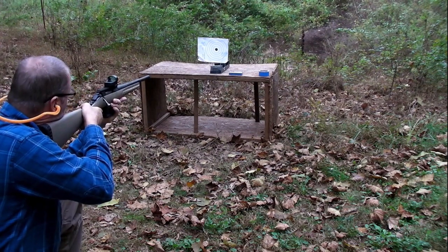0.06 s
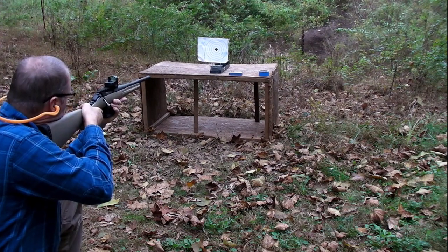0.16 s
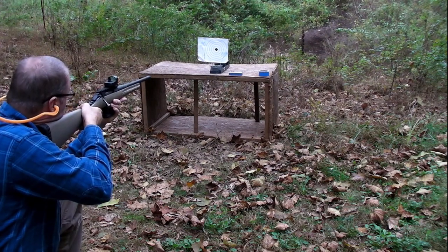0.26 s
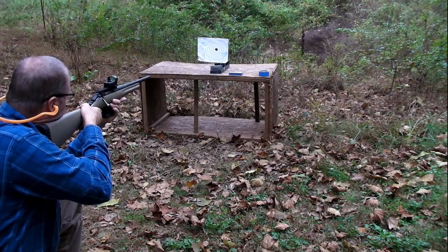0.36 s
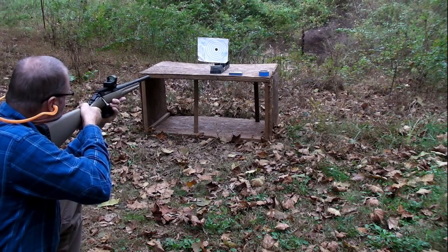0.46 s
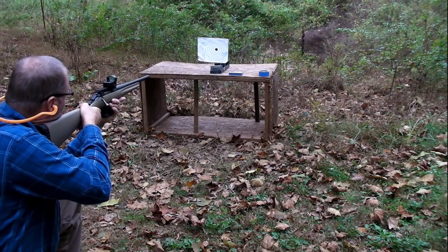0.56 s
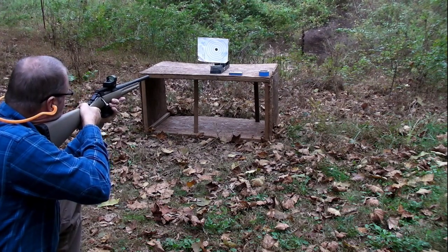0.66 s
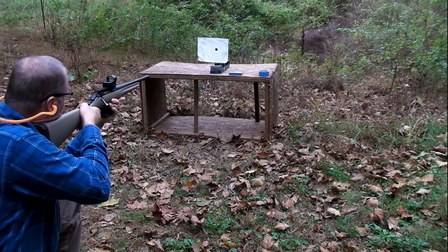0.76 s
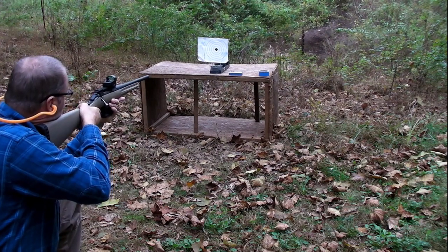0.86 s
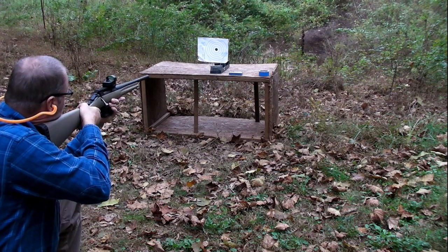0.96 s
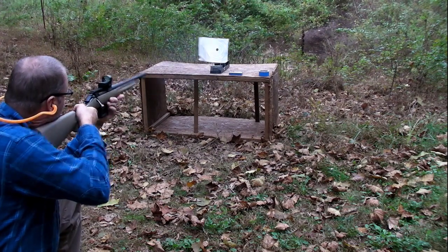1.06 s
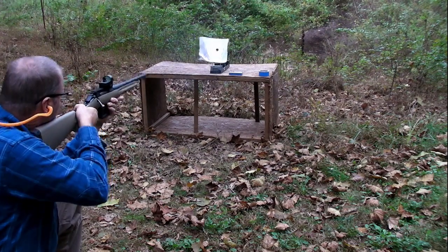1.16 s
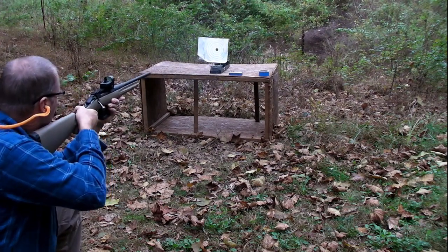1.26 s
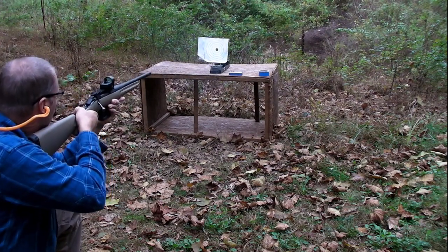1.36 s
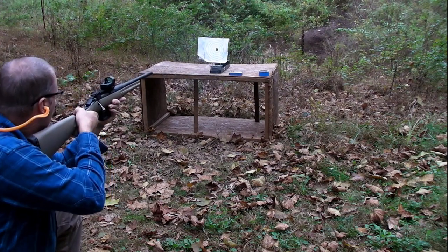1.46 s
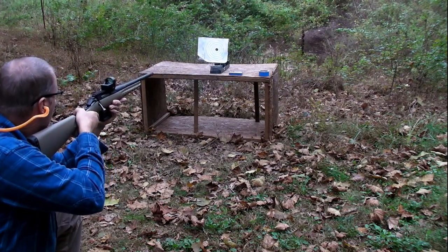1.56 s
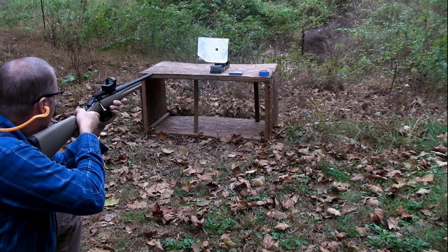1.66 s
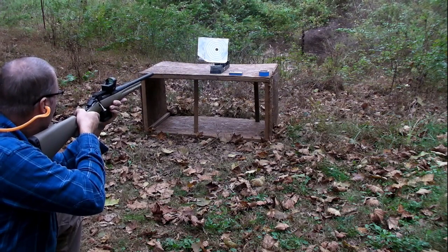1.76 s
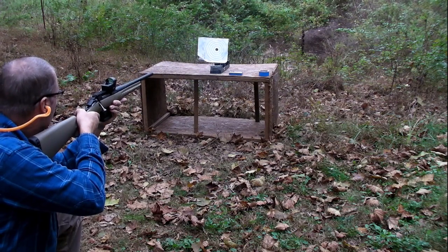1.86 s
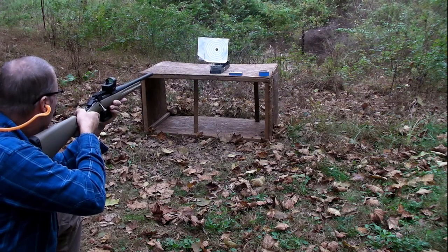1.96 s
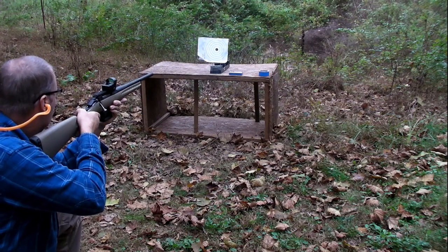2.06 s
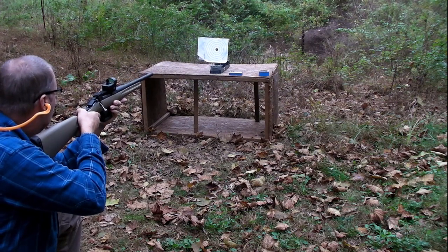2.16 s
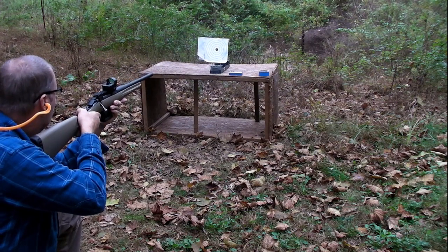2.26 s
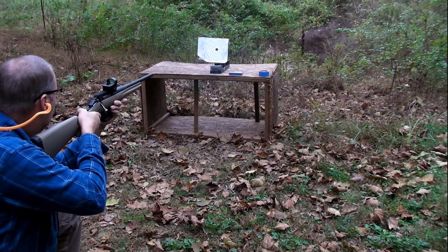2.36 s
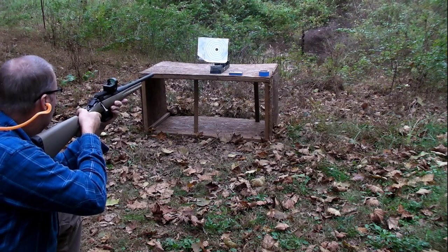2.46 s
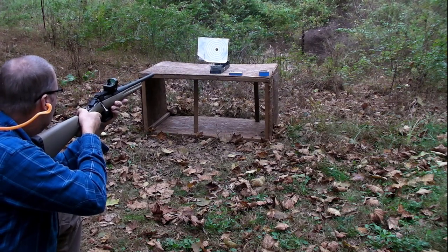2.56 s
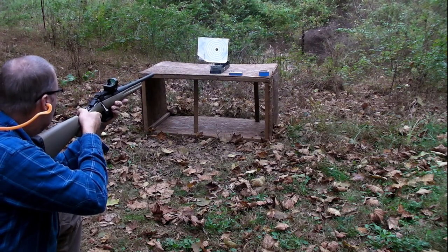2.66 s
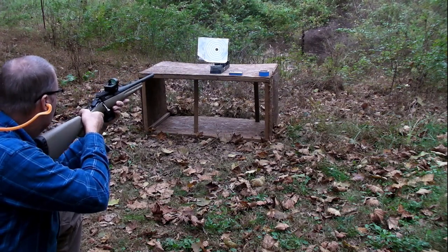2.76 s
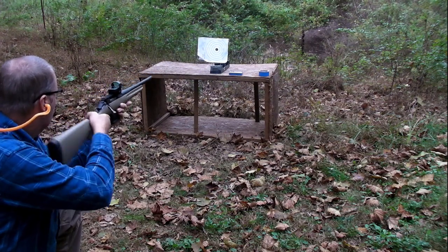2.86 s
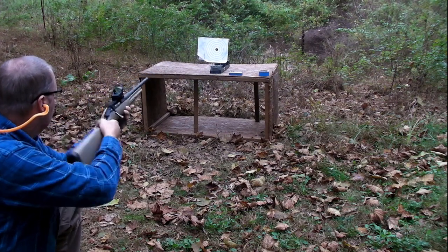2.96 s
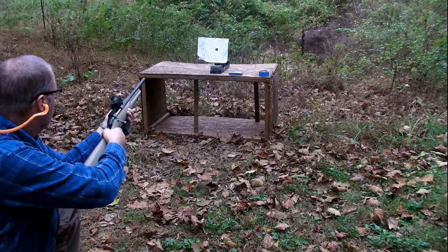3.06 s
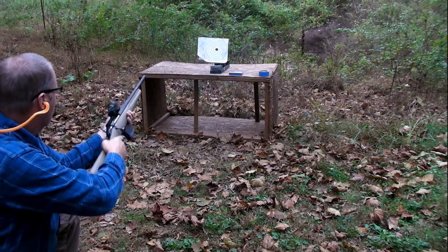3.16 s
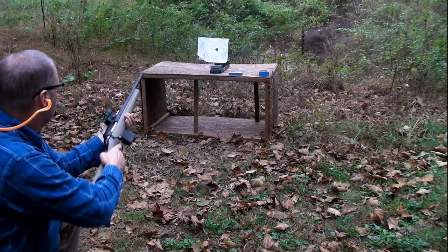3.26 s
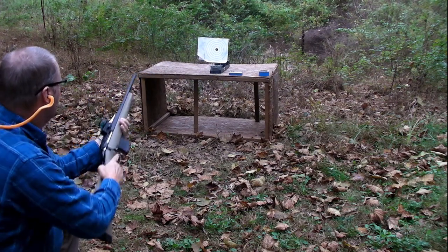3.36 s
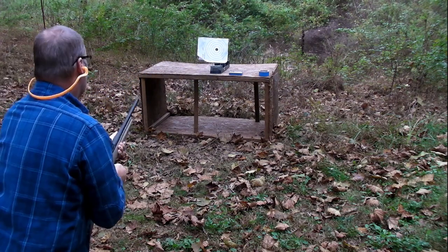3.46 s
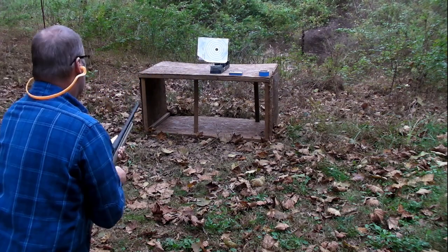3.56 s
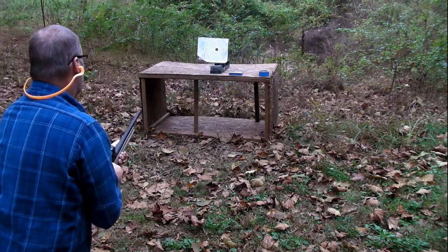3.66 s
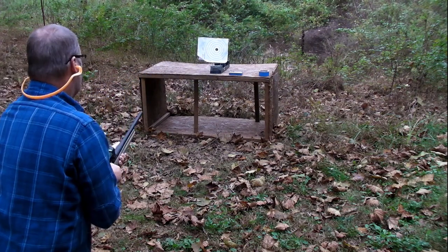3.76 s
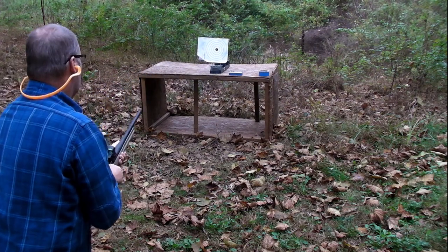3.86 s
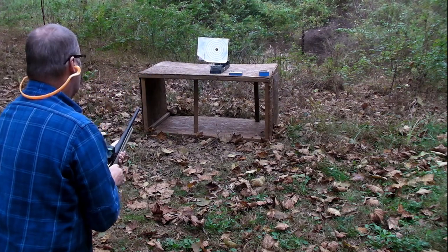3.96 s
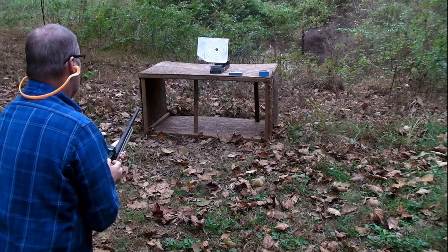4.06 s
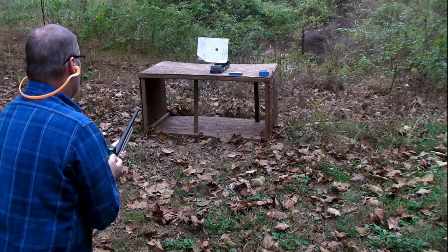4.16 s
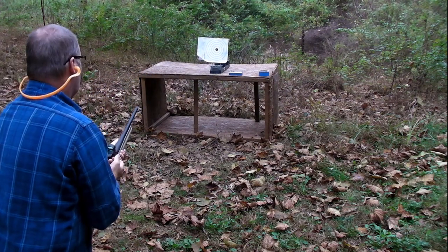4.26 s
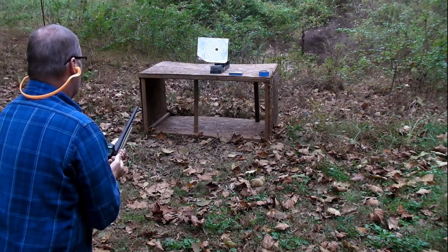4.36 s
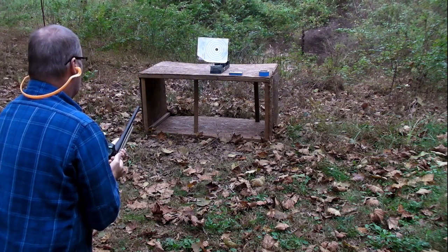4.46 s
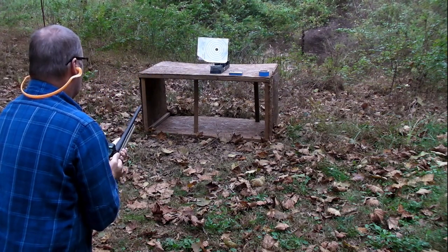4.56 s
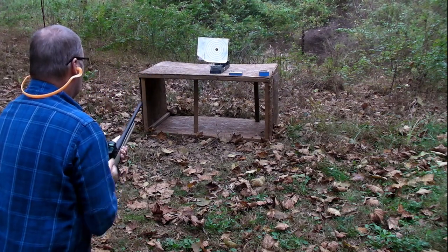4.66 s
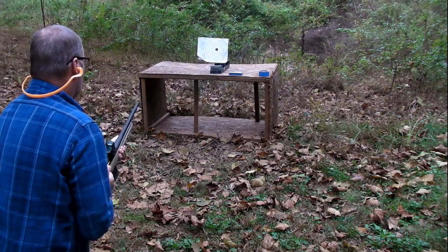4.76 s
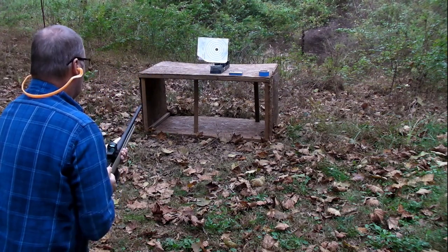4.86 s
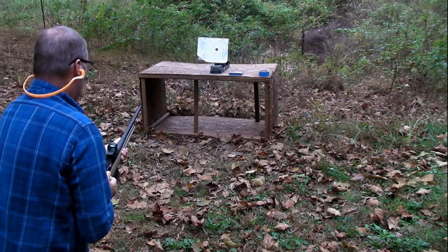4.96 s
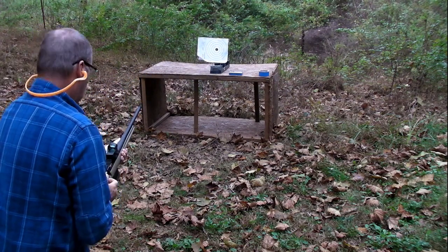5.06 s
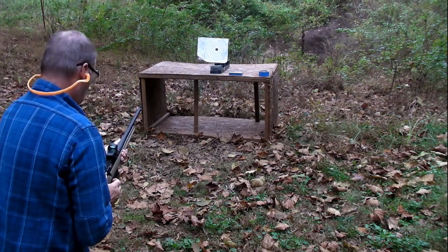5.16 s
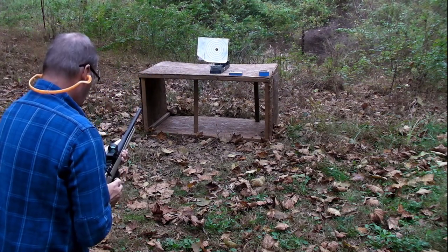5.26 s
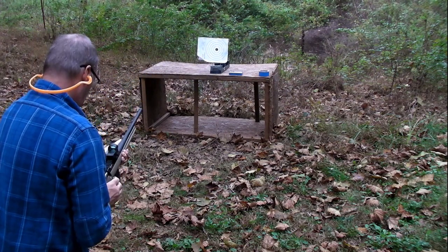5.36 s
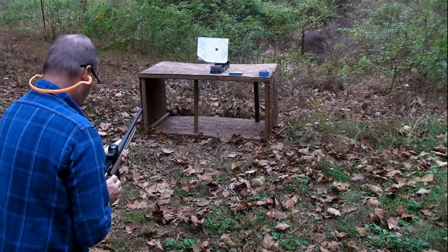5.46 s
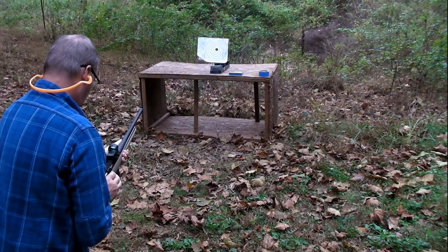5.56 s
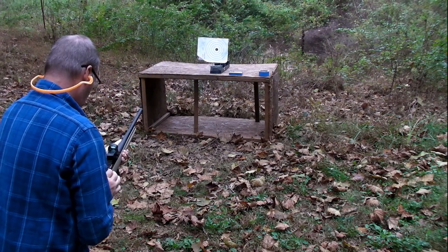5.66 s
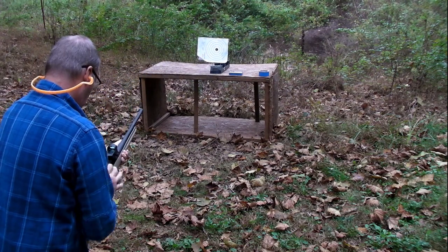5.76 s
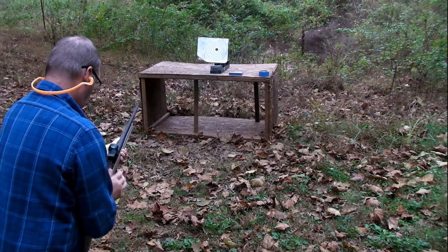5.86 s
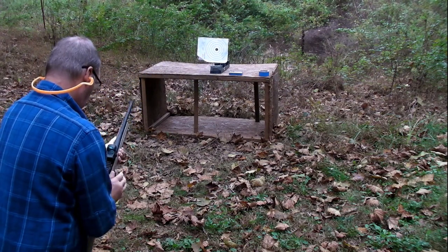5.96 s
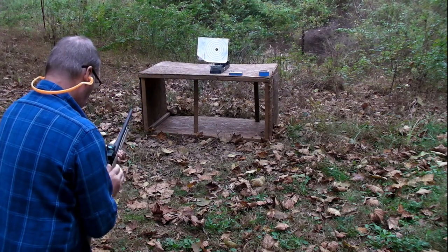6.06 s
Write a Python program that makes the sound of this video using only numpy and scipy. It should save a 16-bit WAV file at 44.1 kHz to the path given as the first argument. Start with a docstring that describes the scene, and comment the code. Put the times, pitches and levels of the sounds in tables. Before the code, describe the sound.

Crickets trill quietly, one close rifle blast cracks and rumbles through trees, then sharp metallic action clacks and sleeve rustles follow.

```python
"""In an autumn wood, one rifle shot overloads a nearby microphone and rolls away through the trees.
The shot is a swelling ring and a roar of noise; its echo is noise that loses treble, then stops abruptly.
Then sleeves rustle as shaped noise, and the rifle's action clacks and scrapes through its resonances.
Crickets trill throughout as chirps and beating tones, and a far bird calls in short arched tones.
Faint air, hiss and soft low bumps lie underneath."""
import sys
import numpy as np
from scipy import signal
from scipy.fft import rfft, irfft
from scipy.io import wavfile
from scipy.ndimage import uniform_filter1d

SR = 44100
rng = np.random.default_rng(int(sys.argv[2]) if len(sys.argv) > 2 else 0)


def int16_out(signal):
    """Quantize to a 16-bit WAV file."""
    q = np.round(np.clip(np.atleast_2d(signal).T, -1, 1) * 32767)
    wavfile.write(sys.argv[1], SR, q.astype(np.int16))


N = 269451
T = np.arange(N) / SR
FREQS = np.maximum(np.arange(N // 2 + 1) * SR / N, 1)
SHOT_S, ECHO_STOP_S = 1.066, 3.482


def undb(db):
    """Turn decibels into a gain."""
    return 10 ** (np.asarray(db) / 20)


def unit(x):
    """Scale to an rms (average strength) of 1."""
    return x / np.sqrt(np.mean(x ** 2))


def at_hz(rows, hz, axis=1):
    """Read one column of a table, joined by straight lines in log frequency."""
    rows = np.array(rows)
    return np.interp(np.log(hz), np.log(rows[:, 0]), rows[:, axis])


def resonance(f, hz, width):
    """Complex response of one resonance, with gain 1 at its centre."""
    return 1 / (1 + 1j * (f / hz - hz / f) * hz / width)


def walk(rate):
    """Smooth random drift with a spread near 1; a higher rate wanders faster."""
    k = max(int(SR / rate), 1)
    steps = np.repeat(rng.standard_normal(N // k + 1), k)[:N]
    return 1.3 * uniform_filter1d(uniform_filter1d(steps, k), k)


def envelope(start_s, attack_s, hold_s, release_db_per_s):
    """Rise, stay until hold_s after the start, then die away."""
    age = T - start_s
    return np.clip(age / attack_s, 0, 1) * undb(-release_db_per_s * np.maximum(age - hold_s, 0))


# how unlike the two microphone ports hear a sound from all around, before each sound's own offset:
# (frequency [Hz], side minus mid [dB])
PORT_WIDTH = [(30, -21), (130, -26), (450, -27.5), (1500, -24.5), (2700, -13), (6000, -15.5), (9000, -5.5),
              (14000, -2)]


def diffuse(side_db=0):
    """Stereo spectrum of white noise from all around: alike in the bass, less alike in the treble."""
    mid, side = rfft(rng.standard_normal((2, N)))
    side = side * undb(np.minimum(at_hz(PORT_WIDTH, FREQS) + side_db, 0))
    return np.array([mid + side, mid - side])


def noise(colour, side_db=0):
    """Stereo noise from all around with a given balance of pitches, rms 1."""
    return unit(irfft(diffuse(side_db) * undb(at_hz(colour, FREQS)), N))


def trees(x, t60, wet_db):
    """Add the scatter from trunks and undergrowth: a fading noise tail, cut off after one second."""
    # (frequency [Hz], level per Hz [dB])
    scatter = noise([(100, -4.0), (600, -7.0), (2000, 2.5), (6000, 0.0), (15000, -1.5)])
    tail = (scatter * undb(-60 * T / t60) * np.minimum(T / 0.0099, 1))[:, :SR]
    tail = tail / np.sqrt(np.sum(tail ** 2) / 2)
    return x + undb(wet_db) * signal.fftconvolve(np.atleast_2d(x), tail, axes=1)[:, :N]


# the roar leaks in under the ring, bursts, sags while it holds, then collapses
ROAR_DB, ROAR_LEAK_DB = 6.5, -23
ROAR_DELAY_S, ROAR_ATTACK_S, ROAR_HOLD_S = .019, .007, .135
ROAR_SAG_DB_PER_S, ROAR_RELEASE_DB_PER_S = 50, 289.5  # the release adds to the sag
# tones of the ring ahead of the roar: (frequency [Hz], level [dB])
RING_TONES = [(657, -18), (1680, -2), (4312, -29.5)]
# pitch balance of the muzzle gas: (frequency [Hz], level per Hz [dB])
GAS_COLOUR = [(20, -5.5), (50, -6.5), (110, -1), (150, -4), (200, 3), (260, -5), (400, 1), (700, -0.5),
              (1700, 3.5), (3000, -1.5), (5500, -6.5), (10000, -14.5), (16000, -26.5)]


def muzzle(swell_s=0.014, hold_s=.012, ring_db=0.0, ring_decay_s=.012):
    """A hard ring swells for a moment, then the roar of the muzzle gas swamps it."""
    age = np.maximum(T - SHOT_S, 0)
    ring = sum(undb(db) * np.sin(2 * np.pi * hz * age + .12 * walk(300)) for hz, db in RING_TONES)
    fade = np.exp(-np.maximum(age - swell_s - hold_s, 0) / ring_decay_s)
    swell = np.minimum(age / swell_s, 1) * fade
    burst = envelope(SHOT_S + ROAR_DELAY_S, ROAR_ATTACK_S, ROAR_HOLD_S, ROAR_RELEASE_DB_PER_S)
    sag = undb(ROAR_DB - ROAR_SAG_DB_PER_S * (age - ROAR_DELAY_S))
    gas = burst * sag + swell * undb(ROAR_LEAK_DB)
    roar = noise(GAS_COLOUR, side_db=5.0) * gas * undb(0.87 * walk(130))
    return undb(ring_db) * swell * ring + roar


# pitch balance of the echo and what air and leaves take away as time passes (below zero: a gain):
# (frequency [Hz], level per Hz at the shot [dB], loss [dB/s])
ECHO_BANDS = [(25, -33, 11), (60, -20, 4), (101, -4, 3), (150.4, -10.5, 7), (203, -5, 17), (252, -15.5, 4),
              (350, -9, -3.5), (465, -2.5, -3.5), (753, 2.5, -0.5), (1230, -1.5, 3), (2010, -1, 8),
              (2732, -2.5, 15), (3530, -6.5, 19.5), (6000, -6.5, 37.5), (9700, -16.5, 54.5),
              (15000, -28.5, 84.5)]
# the blast thrown back by near trunks, a slope, the wide wood and one far face:
# (start [s], build-up [s], level [dB], fade [dB/s])
RETURNS = [(1.087, .042, 4, 59.5), (1.28, .22, -10.5, 39), (1.091, 0.46, -16.5, 14.8),
           (2.568, .005, -30, 190)]


def echo(patchy_db=0.9, grain_db=0.72):
    """Countless reflections as noise; the later ones have come further and lost more treble."""
    age, field, out = np.maximum(T - SHOT_S, 0), diffuse(), 0
    colour = undb(at_hz(ECHO_BANDS, FREQS))
    field = field * colour / np.sqrt(np.mean(colour ** 2))
    centres, _, losses = np.transpose(ECHO_BANDS)
    # overlapping bands, each fading at its own speed
    for share, loss_db in zip(np.eye(len(centres)), losses):
        band = irfft(field * np.interp(np.log(FREQS), np.log(centres), share), N)
        out = out + band * undb(-loss_db * age)
    power = sum((undb(db) * envelope(s, build_s, build_s, fade)) ** 2 for s, build_s, db, fade in RETURNS)
    roll = np.sqrt(power)
    # the roll's loudness wavers slightly at random
    waver = undb(patchy_db * walk(45) + grain_db * walk(500))
    stop = np.clip((ECHO_STOP_S - T) / .005, 0, 1)
    return out * waver * roll * stop


# resonances of the rifle's receiver and stock: (frequency [Hz], width [Hz], level [dB])
BODY_MODES = [(438, 135, -6), (574, 317, -3), (790, 213, -1.5), (1034, 260, -1), (1290, 204, -2),
              (1775, 320, -1.5), (2204, 260, -2), (3010, 500, -8), (3600, 320, -5), (4140, 280, -9.5),
              (5360, 680, -11), (6500, 1300, -12), (9200, 1900, -18.5), (12100, 2600, -22.5)]


def rifle_body(f):
    """Response of the receiver and stock: resonances added with alternating sign."""
    modes = enumerate(BODY_MODES)
    return sum((-1) ** k * undb(db) * resonance(f, hz, width) for k, (hz, width, db) in modes)


# metal parts of the action meeting; ring level is relative to the chatter:
# (time [s], level [dB], decay [s], ring [Hz], ring level [dB], treble tilt reached at 3000 Hz [dB])
CONTACTS = [(3.506, -41, .004, 2150, 5, -6), (3.653, -37, .0027, 2000, -7, 18),
            (3.6925, -22, 0.0038, 1620, 0, -5), (3.7037, -14.5, 0.002, 1460, 3, -1),
            (3.7065, -11, 0.0034, 1253, 2, -4), (4.669, -31, 0.008, 1647, -1, -5),
            (4.691, -27, .0053, 1500, -8, 0), (4.733, -20.5, .0033, 1410, 2, 0),
            (4.7367, -18.5, 0.0045, 1520, -1, 3), (4.749, -9.5, 0.0035, 553, -6, -2),
            (4.7515, -9, 0.0027, 2150, -2, -8), (4.755, -21, .0079, 522, -7, 1),
            (5.134, -43, .006, 2000, -12, 13), (5.145, -39, .0043, 1980, -5, 5),
            (5.818, -36.5, .0047, 1292, -3, -12), (5.8267, -26.5, 0.0035, 1180, -1, -14)]


def action(rise_s=0.0014, side_db=-3, low_cut_hz=150, size=4096):
    """Each contact chatters for a few milliseconds and rings the rifle and the part that was struck."""
    out = np.zeros((2, N + size))
    age, f = T[:size], np.maximum(np.arange(size // 2 + 1) * SR / size, 1)
    body = rifle_body(f) * (1j * f / (1j * f + low_cut_hz)) ** 2
    ports = np.array([np.ones_like(f), undb(at_hz(PORT_WIDTH, f) + side_db)])
    for s, db, decay_s, ring_hz, ring_db, treble_db in CONTACTS:
        fade = np.exp(-age / decay_s)
        chatter = rfft(rng.standard_normal((2, size)) * fade)
        # a hard contact excites all pitches more evenly
        chatter = chatter / np.sqrt(np.abs(chatter))
        tilt = undb(2 * treble_db * f / (f + 3000))
        mid, side = irfft(chatter * body * ports * tilt) * np.exp(-age / 0.052)
        part = np.sin(2 * np.pi * ring_hz * age) * fade * (1 - np.exp(-age / rise_s))
        mid = mid + undb(ring_db) * np.std(mid) * unit(part)
        # the level counts the whole clack's energy as if packed into decay_s
        gain = undb(db) * np.sqrt(decay_s * SR / size)
        start = int(s * SR)
        out[:, start:start + size] += gain * unit(np.array([mid + side, mid - side]))
    return trees(out[:, :N], t60=1.0, wet_db=-20.5)


# the bolt scraping along its track: (start [s], length [s], level [dB])
BOLT_SCRAPES = [(3.812, 0.036, -45), (4.644, .088, -40)]


def bolt_slide(attack_s=0.0084, release_db_per_s=600, grit_db=4, catch_db=2, low_cut_hz=1100, soft_hz=3200):
    """Steel catches and slips on steel; the fine jolts ring the rifle."""
    push = sum(undb(db) * envelope(s, attack_s, length_s, release_db_per_s)
               for s, length_s, db in BOLT_SCRAPES)
    jolts = irfft(diffuse(side_db=-3), N) * undb(grit_db * walk(1500) + catch_db * walk(150))
    contact = 1 / (1 + low_cut_hz / (1j * FREQS)) / (1 + 1j * FREQS / soft_hz)
    return unit(irfft(rfft(jolts) * rifle_body(FREQS) * contact, N)) * push


# a spring that sings on after the action snaps shut:
# (start [s], frequency [Hz], level [dB], time to fade by 60 dB [s])
SPRING_TONES = [(4.752, 1925, -47.5, 0.95), (4.752, 2050, -50, .4)]


def spring():
    """The latch leaves a spring ringing faintly: slightly unsteady, fading tones."""
    out = 0
    for s, hz, db, t60 in SPRING_TONES:
        age = np.maximum(T - s, 0)
        level = undb(db - 60 * age / t60 + 1.5 * walk(50))
        out = out + level * np.sin(2 * np.pi * hz * age + 0.2 * walk(40))
    return out


STROKE_ATTACK_S, STROKE_RELEASE_DB_PER_S, FIDGET_DB = 0.021, 125, -61
# pitch balance of the cloth: (frequency [Hz], level per Hz [dB])
CLOTH_COLOUR = [(60, -12), (150, -3), (350, -8), (800, -6.5), (1150, -5.5), (1450, 2.5), (2400, -5),
                (3400, -1.5), (6000, -5), (10000, -12.5), (15000, -19)]
# sleeves and hands sliding over the gun, one row a stroke: (start [s], length [s], level [dB])
CLOTH_STROKES = [(3.485, .345, -43), (3.608, .14, -40.5), (3.786, .04, -43), (4.655, .06, -49),
                 (4.709, 0.087, -37.5), (5.124, .025, -49), (5.307, 0.028, -56)]


def sleeves(grain_db=3, catch_db=1.5):
    """Cloth slides in tiny catches and slips with each stroke, and stirs faintly once the echo has stopped."""
    power = sum((undb(db) * envelope(s, STROKE_ATTACK_S, length_s, STROKE_RELEASE_DB_PER_S)) ** 2
                for s, length_s, db in CLOTH_STROKES)
    motion = np.sqrt(power + undb(FIDGET_DB) ** 2 * (T > ECHO_STOP_S))
    catches = unit(undb(grain_db * walk(1200) + catch_db * walk(77)))
    return noise(CLOTH_COLOUR) * catches * motion


LULL_HOLD_S, LULL_RETURN_S = 1.09, 1.65


def lull(depth_db):
    """Gain that sinks at the shot, stays low, creeps back, and is full at once when the echo stops."""
    sunk = np.clip(1 - (T - SHOT_S - LULL_HOLD_S) / LULL_RETURN_S, 0, 1)
    return undb(depth_db * sunk * (T > SHOT_S) * (T < ECHO_STOP_S))


def near_cricket(stroke_hz=51.4, top_hz=4650, fall_hz=950, level_db=-55.0, count=8):
    """Each wing stroke is a falling chirp; one stroke in every count is skipped between short trills."""
    strokes = np.cumsum(stroke_hz * (1 + 0.062 * walk(12))) / SR
    phase = strokes % 1
    tone = np.sin(2 * np.pi * np.cumsum(top_hz - fall_hz * phase + 45 * walk(500)) / SR)
    stroke_shape = np.sin(np.pi * phase) ** 2 * np.exp(-phase)
    sounding = strokes.astype(int) % count > 0
    trill = tone * stroke_shape * sounding * undb(1.3 * walk(25))
    return trees(unit(trill) * lull(depth_db=-16), t60=.3, wet_db=-7.0) * undb(level_db)


def far_crickets(hz, width_hz=150, skirt_db=-6, skirt_hz=480, side_db=-9):
    """Far crickets near one pitch beat against each other: a randomly wavering tone, rms 1."""
    carrier = np.exp(2j * np.pi * hz * T)

    def beating():
        """One tone with a narrow spread of pitch and a fainter wide one."""
        core = walk(2 * width_hz) + 1j * walk(2 * width_hz)
        skirt = walk(2 * skirt_hz) + 1j * walk(2 * skirt_hz)
        return np.real(carrier * (core + undb(skirt_db) * skirt))

    mid, side = beating(), beating()
    return unit(mid + undb(side_db) * side * np.array([[1], [-1]]))


TRILL_ATTACK_S, TRILL_RELEASE_DB_PER_S = 0.062, 119.5
CHORUS_HZ, CHORUS_DB = 3830, -53.5
# far crickets that stand out, one row a trill: (start [s], length [s], pitch [Hz], level [dB])
FAR_TRILLS = [(0, 0.35, 3710, -51.5), (.64, .42, 3830, -48), (2.45, .52, 3870, -44),
              (3.22, 0.21, 3640, -50), (3.85, 0.27, 3840, -54), (4.402, .27, 3670, -54),
              (4.878, 0.41, 3846, -47.5), (5.68, 0.42, 3670, -52.5), (5.83, 0.3, 3850, -50)]


def chorus():
    """A steady bed of far crickets, with trills swelling out of it, all under the lull."""
    out = far_crickets(CHORUS_HZ) * undb(CHORUS_DB)
    for s, length_s, hz, db in FAR_TRILLS:
        swell = envelope(s, TRILL_ATTACK_S, length_s, TRILL_RELEASE_DB_PER_S)
        out = out + far_crickets(hz) * undb(db) * swell
    return out * lull(depth_db=-12)


# a far bird: (start [s], top pitch before waver [Hz], level [dB])
BIRD_CALLS = [(.455, 1495, -50), (4.405, 1450, -51.5), (5.684, 1453, -53.5)]


def bird(length_s=0.1, arch=.13, waver=.018):
    """A short arched, slightly hoarse call that hangs in the trees."""
    out = 0
    for s, hz, db in BIRD_CALLS:
        progress = np.clip((T - s) / length_s, 0, 1)
        # the pitch peaks about two thirds of the way through
        pitch = hz * (1 - arch * (progress / 0.66 - 1) ** 2 + waver * walk(300))
        level = undb(db + 3 * walk(150)) * np.sin(np.pi * progress)
        out = out + level * np.sin(2 * np.pi * np.cumsum(pitch) / SR)
    return trees(out, t60=2.2, wet_db=-3.0)


def low_bumps(per_s=12, hz=100, width_hz=120, soft_hz=300, low_cut_hz=40, level_db=-61.5):
    """Soft low bumps patter at random on the left, the right or both: clicks through a low resonance."""
    left, right, both = (rng.random((3, N)) < per_s / SR) * rng.uniform(.5, 1, (3, N))
    softening = (1 + 1j * FREQS / soft_hz) ** 3
    shape = resonance(FREQS, hz, width_hz) / softening / (1 + low_cut_hz / (1j * FREQS))
    bumps = unit(irfft(rfft([left + both, right + both]) * shape, N))
    return bumps * undb(level_db) * lull(depth_db=-12.5)


# pitch balance of each microphone's own hiss: (frequency [Hz], level per Hz [dB])
HISS_COLOUR = [(15, -29.5), (40, -14), (100, -3), (250, -3), (500, 1.5), (1000, -0.5), (2000, 0),
               (3200, -0.5), (5000, -9), (6500, -11), (9000, -11), (11000, -14.5), (16000, -15)]


def air(hiss_db=-51.5, wood_db=-62):
    """Faint, slowly drifting woodland air under hiss that is unrelated left and right."""
    hiss = unit(irfft(rfft(rng.standard_normal((2, N))) * undb(at_hz(HISS_COLOUR, FREQS)), N))
    # (frequency [Hz], level per Hz [dB])
    wood = noise([(20, -24.5), (60, -5.5), (200, -3.5), (450, 1), (1500, -8), (3000, -12.0),
                  (5800, -8.0), (7500, -16.5), (15000, -30.5)])
    return hiss * undb(hiss_db) + wood * undb(wood_db + walk(1.6))


def scene():
    """Add the shot, the gun handling and the living wood."""
    shot = muzzle() + echo()
    handling = action() + bolt_slide() + spring() + sleeves()
    wood = near_cricket() + chorus() + bird() + low_bumps() + air()
    return shot + handling + wood


NOTCH_HZ, NOTCH_WIDTH_HZ, TOP_HZ = 7875, 480, 16000


def record(dry):
    """The recorder's response has a narrow notch, its input stage flattens the blast, and the top is cut."""
    response = 1 - .9 * resonance(FREQS, NOTCH_HZ, NOTCH_WIDTH_HZ)
    heard = irfft(rfft(dry) * response, N)
    # the peaks flatten with a short knee
    clipped = heard / (1 + (heard * heard) ** 4) ** (1 / 8)
    return signal.sosfilt(signal.ellip(8, .2, 70, TOP_HZ, fs=SR, output="sos"), clipped)


dry = scene()
out = record(dry)
int16_out(out)
```